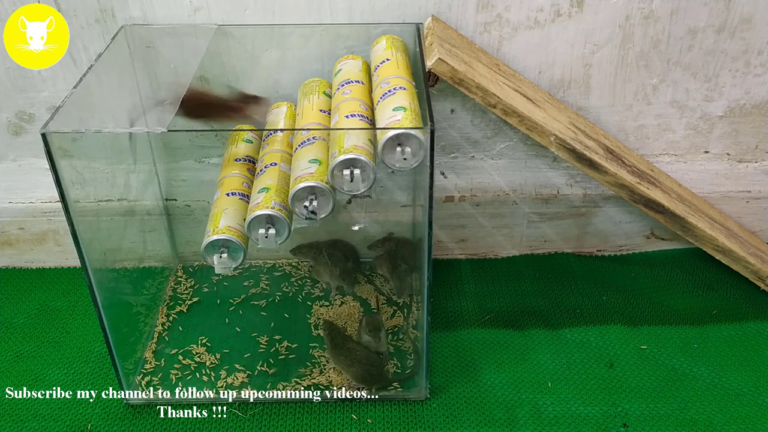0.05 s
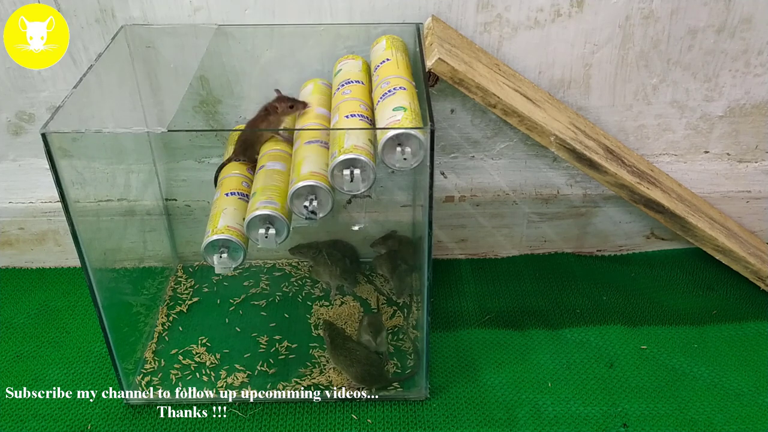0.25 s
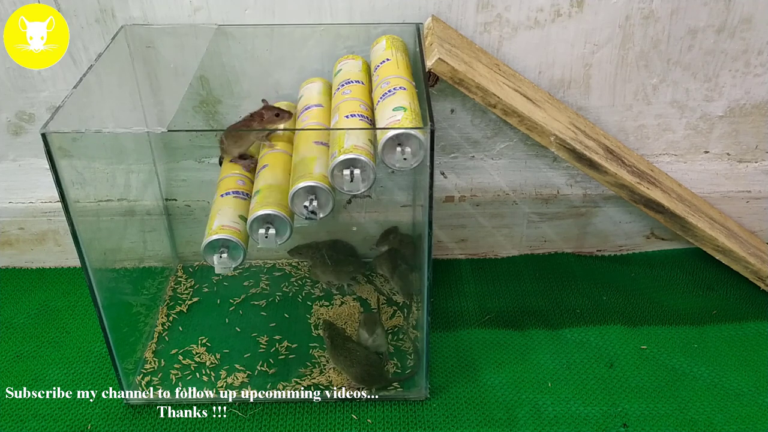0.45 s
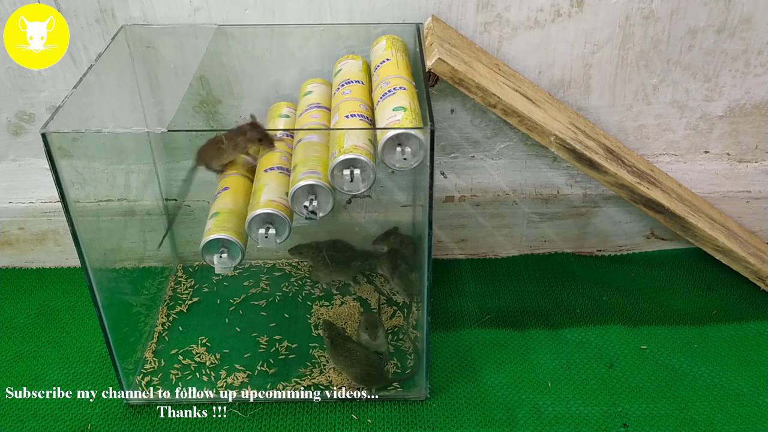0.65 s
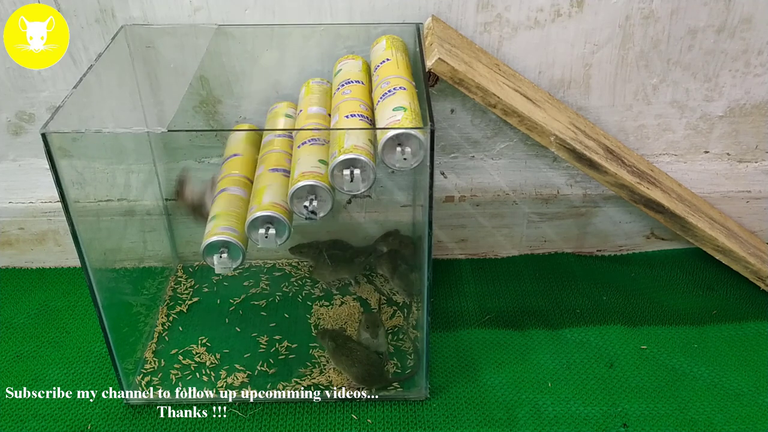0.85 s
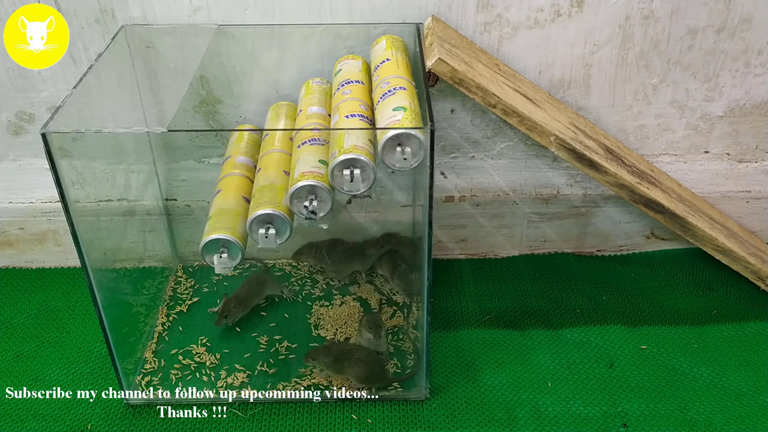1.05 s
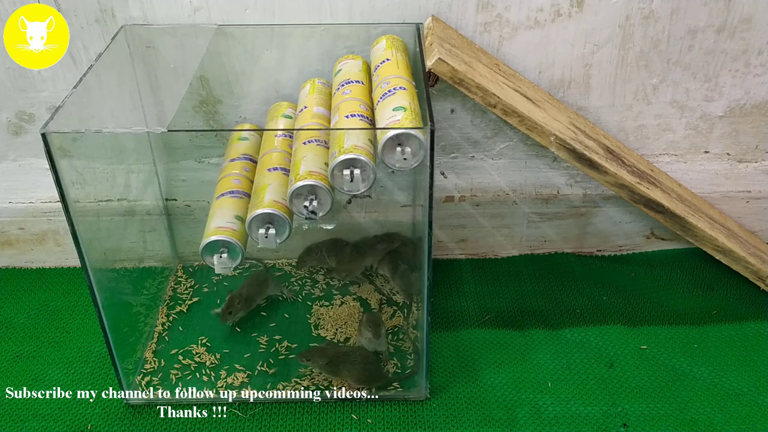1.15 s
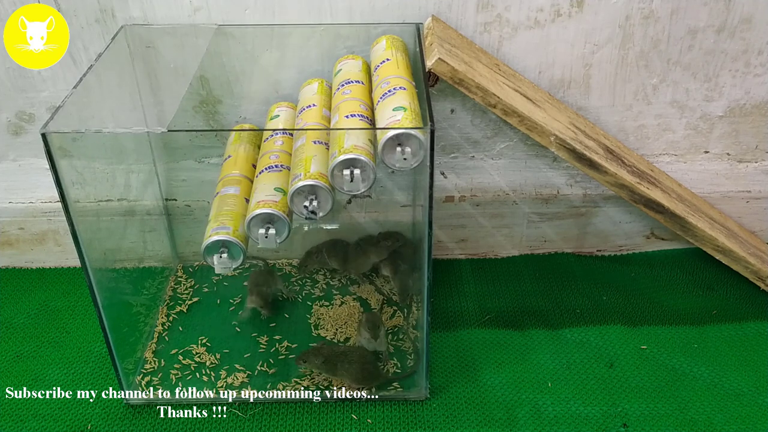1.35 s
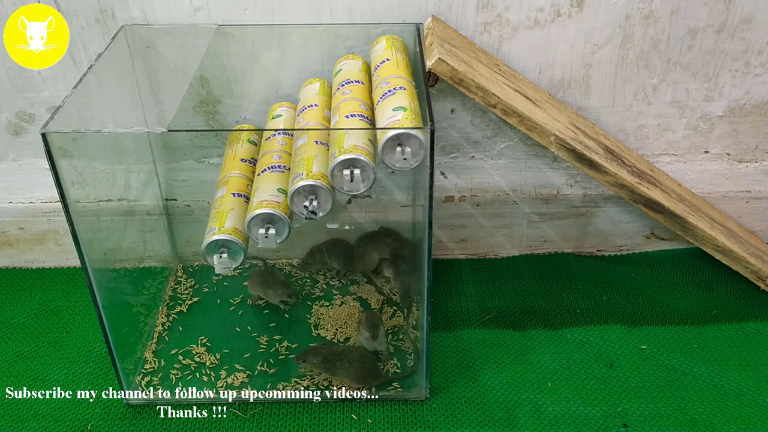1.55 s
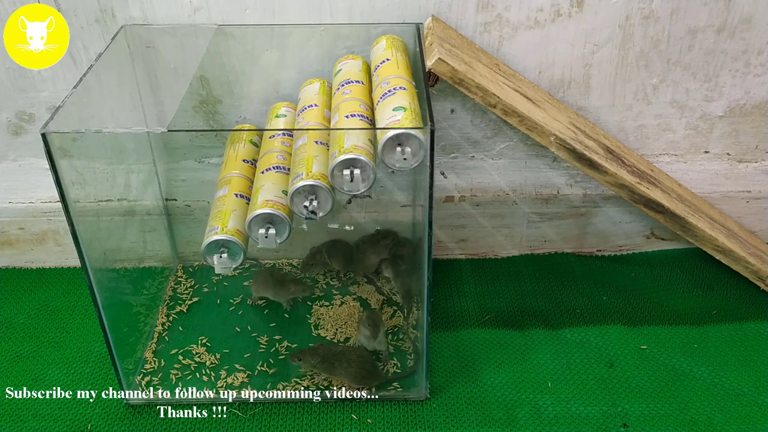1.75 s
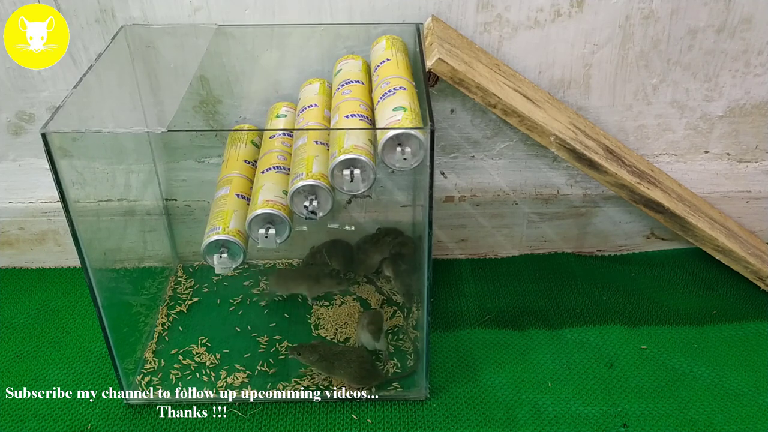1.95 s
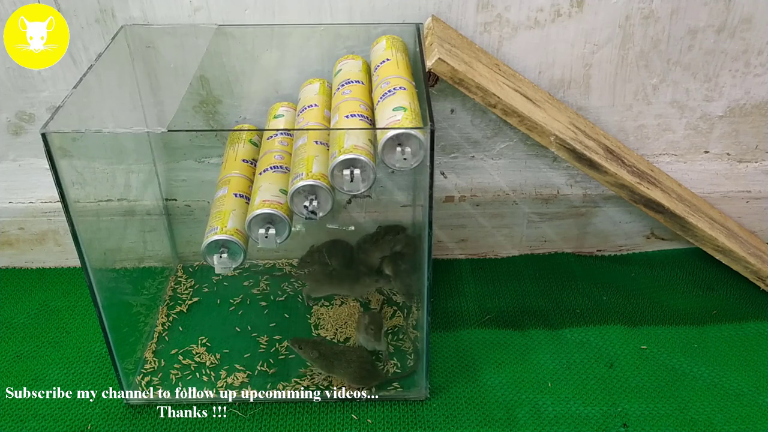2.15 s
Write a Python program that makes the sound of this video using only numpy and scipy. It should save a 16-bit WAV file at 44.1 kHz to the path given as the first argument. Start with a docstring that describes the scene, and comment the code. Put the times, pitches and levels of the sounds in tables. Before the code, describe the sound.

Empty drink cans rattle and clack as a mouse scrabbles over them inside a glass tank.

```python
"""In a bare, echoing room with a low hum, mice scurry on the seed-strewn bottom of a glass tank.
One jumps onto a row of empty drink cans laid across the tank, scrabbles, flicks a free can and slips off.
The cans clack together and buzz; the mouse drops to the bottom, and one bumps the side pane.
Each blow is a chatter of tiny contacts that rings thin can walls or glass; claws add dense ticks."""
import sys
import numpy as np
from scipy import signal
from scipy.fft import rfft, irfft
from scipy.io import wavfile
from scipy.ndimage import uniform_filter1d

SR = 44100
rng = np.random.default_rng(int(sys.argv[2]) if len(sys.argv) > 2 else 0)


def dump(signal):
    """Clip the signal to [-1, 1] and save it as 16-bit WAV at the path in sys.argv[1]."""
    limited = np.clip(np.atleast_2d(signal).T, -1, 1)
    pcm = np.round(limited * 32767).astype(np.int16)
    wavfile.write(sys.argv[1], SR, pcm)


N = 97020

# Left-right likeness. Each row: frequency in Hz, correlation.
STEREO_CORRELATION = [(60, 0.88), (170, 0.94), (350, 0.81), (700, 0.46), (1400, 0.078), (2800, 0.014),
                      (6000, -0.055), (14000, 0.051)]
# Ring of the glass tank. Each row: frequency in Hz, level in dB re the blow's band, t60 in seconds.
TANK_MODES = [(118.6, -8, 0.45), (182.4, -9.5, 0.29), (264.8, -14, 1), (435, -7.5, 0.78),
              (540.4, -19, 0.99), (809.5, -10, 0.24), (925, -13, 0.078)]
# Resonances of a can under paws, and of clacking cans. Each row: frequency in Hz, gain in dB.
PAWED_CAN_BODY = [(100, 5.5), (250, 2.5), (380, 1), (650, -2.5), (730, 1), (800, 5.5), (900, 0),
                  (1050, -2.5), (1300, 5), (1600, 4), (2000, 9.5), (2500, 8.5), (3200, 5.5), (3550, 2),
                  (4100, -0.5), (4550, -0.5), (5200, 0.5), (7000, 2), (8500, 2), (9600, -1), (11500, 5.5),
                  (16000, -5.5)]
CLACKING_CAN_BODY = [(100, -23), (500, 1.5), (1000, -3), (1250, 5.5), (1400, -5), (1900, 4), (2150, 8.5),
                     (2400, 4), (2600, 4.5), (2800, 3), (2950, -20), (3130, 4), (3390, -11), (3660, 1),
                     (4170, 3), (4480, -8), (4680, 5), (4870, -3), (5080, 5), (5270, 3.5), (5430, -3),
                     (5680, 1.5), (5880, 7.5), (6000, -4), (6300, 6.5), (6580, -2), (6760, 0), (7000, 6),
                     (7250, 1), (7700, 4.5), (8150, 1), (8600, 3.5), (8950, -6), (9150, 0), (9550, 2),
                     (10080, -6), (10400, 1), (11300, -1), (16000, -9.5)]


def amp(db):
    return 10 ** (np.asarray(db) / 20)


def unit(x):
    """Scale to unit energy per channel, on average."""
    return x / np.sqrt(np.mean(np.sum(x ** 2, axis=-1)) + 1e-20)


def along(points, hz):
    """Read a table on a log-frequency axis."""
    p = np.array(points, float)
    return np.interp(np.log(hz + 1), np.log(p[:, 0]), p[:, 1])


def bins_hz(size=N):
    return np.fft.rfftfreq(2 * size, 1 / SR)


def shape(x, gain):
    """Minimum-phase filter with the given gain per bin."""
    n = x.shape[-1]
    cepstrum = irfft(np.log(np.maximum(gain, 1e-5)))
    cepstrum[1:n] *= 2
    cepstrum[n + 1:] = 0
    return irfft(rfft(x, 2 * n) * np.exp(rfft(cepstrum)))[..., :n]


def whiten(x, smooth_hz=141):
    """Flatten the broad colour of a stereo response; keep its fine structure."""
    n = x.shape[-1]
    power = np.mean(np.abs(rfft(x, 2 * n)) ** 2, axis=0)
    smooth = uniform_filter1d(power, max(int(smooth_hz * 2 * n / SR), 1))
    return shape(x, (np.abs(smooth) / smooth.mean() + 1e-6) ** -.5)


def stereo_noise():
    """Two noises, alike in the bass, unrelated in the treble."""
    likeness = np.clip(along(STEREO_CORRELATION, bins_hz()), -1, 1)
    weights = np.sqrt([(1 + likeness) / 2, (1 - likeness) / 2])
    mid, side = rfft(rng.standard_normal((2, 2 * N))) * weights
    return irfft(np.array([mid + side, mid - side]))[:, :N]


def excite(force, response):
    return signal.fftconvolve(np.atleast_2d(force), response, axes=1)[:, :N]


def room_response(direct_db=-28, early_db=-4, early_decay_s=0.006):
    """Direct sound alike in both channels, quick tank reflections, room tail; levels re the tail."""
    # Room decay. Each row: frequency in Hz, t60 in seconds.
    room_t60 = [(100, 0.27), (250, 0.68), (530, 0.27), (1400, 0.48), (3700, 0.49), (9700, 0.46),
                (16000, 0.32)]
    t, noise, tail = np.arange(N) / SR, rfft(stereo_noise(), 2 * N), 0
    centres_hz = np.geomspace(100, 16000, 8)
    for hz, pick in zip(centres_hz, np.eye(len(centres_hz))):
        band = irfft(noise * along(list(zip(centres_hz, pick)), bins_hz()))[:, :N]
        tail = tail + band * np.exp(-np.log(1000) * t / along(room_t60, hz))
    early = stereo_noise() * np.exp(-t / early_decay_s)
    out = unit(tail) + amp(early_db) * unit(early)
    out[:, 0] += amp(direct_db)
    return unit(out)


def room_tone(air_db=-48, hum_db=-47.5):
    """Faint hiss and a wavering low hum."""
    # Colour of the room's air. Each row: frequency in Hz, gain in dB.
    air_colour = [(25, -20), (45, 1.5), (70, -4.5), (130, -2.5), (250, 2), (400, -30.5), (900, -13),
                  (2000, -35), (5000, -24), (8000, -19.5), (12000, -26.5), (16000, -46)]
    # Hum bands. Each row: centre in Hz, width in Hz, level in dB re hum_db.
    hum_bands = [(62, 8, 0), (86, 4, -2), (119, 6, -7)]
    out = amp(air_db) * unit(shape(stereo_noise(), amp(along(air_colour, bins_hz()))))
    for hz, width_hz, db in hum_bands:
        band = np.exp(-((bins_hz() - hz) / width_hz) ** 2)
        hum = irfft(rfft(rng.standard_normal(2 * N)) * band)[:N]
        out = out + amp(hum_db + db) * unit(hum)
    return out * np.sqrt(N)


def ring(hz, t60_s, t, split_hz=20.7, rise_s=0.0029):
    """A decaying mode; thin walls split off two beating neighbours, weaker below 800 Hz."""
    likeness = np.clip(along(STEREO_CORRELATION, hz), -1, 1)
    lag_rad = np.arccos(likeness) / 2 * np.array([[1], [-1]])
    neighbour, wave = amp(-2) * min(hz / 800, 1) ** 2, 0
    for side, gain in ((0.012, 0.76), (-1.043, neighbour), (1, neighbour)):
        partial_hz = hz + side * split_hz * (.5 + rng.random())
        phase = 2 * np.pi * (partial_hz * t + rng.random())
        wave = wave + gain * np.sin(phase + rng.choice([-1, 1]) * lag_rad)
    return unit(wave * np.exp(-np.log(1000) * t / t60_s) * (1 - np.exp(-t / rise_s)))


def mode_clusters(hz, spread_db=2.8, spacing_hz=110, full_from_hz=3000):
    """Random gain curve: each struck spot favours its own clusters of wall modes."""
    knots_hz = np.arange(0, SR / 2, spacing_hz)
    ripple = np.interp(hz, knots_hz, rng.standard_normal(len(knots_hz)))
    return amp(spread_db * np.minimum(hz / full_from_hz, 1) * ripple)


def strikes(blows, space, body, modes, contacts_per_s=2000, first_touch=0.15):
    """A touch and a dying chatter of contacts ring the body's modes and the struck spot's own note."""
    # Each row of blows: start in seconds, chatter decay in seconds, clink, clank, knock, thud and tick
    # band levels in dB, note in Hz, note level in dB. Levels are taken over 50 ms.
    # Each row of body: frequency in Hz, gain in dB.
    # Each row of modes: frequency in Hz, level in dB re the blow's band, t60 in seconds.
    # Edges in Hz of the thud, knock, clank, clink and tick bands.
    edges_hz = [70, 300, 1200, 3500, 8500, 17000]
    size = 2 ** 15
    out, t = np.zeros((2, N + size)), np.arange(size) / SR
    grid_hz = bins_hz(size)
    colour = amp(along(body, grid_hz))
    bands = [signal.butter(4, edge, "band", fs=SR, output="sos") for edge in zip(edges_hz, edges_hz[1:])]
    for start_s, chatter_s, clink, clank, knock, thud, tick, note_hz, note_db in blows:
        contacts = rng.choice([-1, 1], size) * (rng.random(size) < contacts_per_s / SR)
        force = unit(contacts * np.exp(-t / chatter_s))
        force[0] += first_touch
        echoed = whiten(excite(force, space[:, :size])[:, :size])
        clatter = shape(echoed, colour * mode_clusters(grid_hz))
        levels_db = (thud, knock, clank, clink, tick)
        blow = sum(amp(db) * unit(signal.sosfilt(band, clatter)) for band, db in zip(bands, levels_db))
        blow += amp(note_db) * ring(note_hz, t60_s=0.56, t=t)
        for hz, db, t60_s in modes:
            band_db = levels_db[np.searchsorted(edges_hz, hz) - 1]
            blow += amp(db + band_db) * ring(hz, t60_s, t)
        i = int(start_s * SR)
        out[:, i:i + size] += blow * np.sqrt(SR / 20)
    return out[:, :N]


def scratching(space, body, level_curve, ticks_per_s=450, spread_db=4.5):
    """Dense, uneven ticks through a body. Each row of level_curve: time in seconds, level in dB."""
    # Colour of scratching. Each row: frequency in Hz, gain in dB.
    scratch_colour = [(40, -15.5), (130, 7), (260, 6), (400, 6.5), (900, 1.5), (2100, -6), (3500, -7.5),
                      (7000, -6), (12000, -12), (16000, -8.5)]
    response = shape(whiten(space), amp(along(body, bins_hz()) + along(scratch_colour, bins_hz())))
    ticks = rng.standard_normal(N) * (rng.random(N) < ticks_per_s / SR)
    ticks *= amp(spread_db * np.minimum(rng.exponential(size=N), 2))
    envelope = amp(np.interp(np.arange(N) / SR, *np.array(level_curve).T))
    return excite(unit(ticks) * np.sqrt(N) * envelope, unit(response))


def floor_bumps(space):
    """Mice bump the tank's bottom and walls: seed rattles, glass rings."""
    # Bumps and the colour of seed on glass; columns as in strikes.
    bumps = [ (.000, 0.007, -49.5, -49, -57, -70, -52, 888, -51),
             (.026, 0.0088, -53.5, -54, -78, -47, -56, 525, -53),
             (.034, 0.012, -55, -48, -49.5, -64, -54, 117.2, -38),
             (.130, 0.044, -54.5, -53.5, -55, -44, -55.5, 127, -39),
             (1.185, 0.031, -44, -56, -50.5, -36, -54, 416, -42.5),
             (1.292, 0.003, -63, -43.5, -44.5, -41.5, -66, 92.5, -41),
             (1.353, 0.00058, -51, -41, -51, -49, -50.5, 2160, -71),
             (1.364, 0.0054, -70, -42, -48, -42, -57, 2660, -50),
             (1.372, 0.021, -67, -38.5, -43, -43.5, -53, 1900, -50),
             (1.385, 0.0058, -47, -40.5, -52, -54, -68, 2680, -50),
             (1.423, 0.027, -42.5, -53, -53, -40.5, -37.5, 221, -45),
             (1.492, 0.0087, -60, -45.5, -44, -43, -48, 90, -37.5),
             (1.575, 0.0046, -56, -44, -50, -42.5, -63, 811, -45),
             (1.602, .006, -59, -52, -61, -55, -68, 2430, -53.5), ]
    seed_body = [(100, 17.5), (700, 15.5), (1100, -1.5), (1480, 1), (1620, -4), (1850, 2.5), (2150, -4.5),
                 (2600, 0.5), (3350, -7.5), (4000, -3.5), (5000, -0.5), (5800, 1.5), (8000, -1.5),
                 (10000, 4.5), (13000, 2), (16000, -2)]
    return strikes(bumps, space, seed_body, TANK_MODES)


def claw_scrabble(space):
    """Claws scratch on metal and seed."""
    # Scratching effort. Each row: time in seconds, level in dB.
    effort = [(0, -67), (.13, -60), (.2, -42.5), (.3, -38.5), (.41, -28), (.52, -34.5), (.64, -42),
              (.75, -37), (.84, -36), (0.938, -26.5), (1.02, -30), (1.08, -39.5), (1.3, -45), (1.45, -39),
              (1.66, -52), (2.2, -53.5)]
    return scratching(space, PAWED_CAN_BODY, effort)


def paw_landings(space):
    """Paws land on the cans, ringing them and the tank beneath."""
    # Landings and the ring of a can damped by the mouse; columns as in strikes.
    landings = [ (.212, 0.0029, -34, -60, -56, -50, -43, 5940, -38),
                (.223, 0.022, -34, -34.5, -36.5, -31.5, -33, 121, -33),
                (.264, 0.0037, -29, -33.5, -32, -32, -53, 119.3, -28.5),
                (.292, 0.034, -36, -33.5, -39, -41.5, -53, 615, -46),
                (.365, 0.0018, -42, -38.5, -37, -38.5, -49, 452, -40.5),
                (.550, 0.0069, -55, -42, -37.5, -47, -46, 626, -45),
                (.564, 0.0014, -33.5, -37.5, -62, -39.5, -51, 185, -36.5),
                (.588, 0.0086, -60, -36, -76, -59, -61, 2380, -40),
                (.657, 0.006, -44, -48, -44.5, -46, -52, 280, -37.5),
                (.724, 0.004, -51, -45.5, -44.5, -46, -69, 802, -38),
                (.805, 0.0051, -51, -42.5, -42.5, -42, -52, 797, -38.5),
                (.857, 0.0087, -41.5, -48, -47, -39, -40, 753, -48), ]
    damped_modes = [(621.6, -3.5, 0.69), (708, -7, 1), (819, -15, 0.45), (2540, -17, 0.4),
                    (2696, -18, 0.33), (4150, -26, 0.19), (6200, -22, 0.093)]
    return strikes(landings, space, PAWED_CAN_BODY, TANK_MODES + damped_modes)


def claw_clicks(decay_s=0.001):
    """A claw tip snaps on metal or glass: a dry, fast-dying noise burst."""
    # Claw snaps. Each row: start in seconds, level in dB over 50 ms.
    snaps = [(.212, -48), (0.2236, -34), (.2655, -47), (.302, -37), (0.5641, -40), (0.9754, -40),
             (1.356, -49), (1.3646, -52), (1.386, -44), (1.849, -42)]
    # Colour of a click. Each row: frequency in Hz, gain in dB.
    click_body = [(200, -4), (1500, -9), (4000, 1), (8000, 1), (12000, -11.5), (16000, 3)]
    size = 2 ** 10
    out, t = np.zeros((2, N + size)), np.arange(size) / SR
    colour = amp(along(click_body, bins_hz(size)))
    for start_s, db in snaps:
        click = shape(rng.standard_normal((2, size)) * np.exp(-t / decay_s), colour)
        i = int(start_s * SR)
        out[:, i:i + size] += amp(db) * unit(click) * np.sqrt(SR / 20)
    return out[:, :N]


def can_flicks(space):
    """A paw flicks a free can, which rings brightly."""
    # Flicks, the free can's resonances and its ring; columns as in strikes.
    flicks = [ (.4415, 0.0093, -30, -37, -46, -56, -38, 4094, -39),
              (.468, .014, -56, -41, -56, -48, -43, 2425, -40), ]
    free_can_body = [(100, 0), (700, -1), (1400, -3), (1720, -4), (1950, -8), (2120, -3), (2300, 6),
                     (2480, 16), (2680, -1), (2850, -2), (3380, 1), (3480, -16), (3600, -18), (3720, 0),
                     (3900, -6), (4110, 10.5), (4380, -4), (4560, -22), (4730, 8), (5080, 4), (5280, -8),
                     (5520, 7), (5850, 7), (6120, -2), (6300, 6), (6420, -10), (6600, -3), (7130, 4),
                     (7400, 2), (7950, 4), (8250, 2), (8850, 1), (9200, -3), (9450, 2), (10300, -1),
                     (11500, 2), (16000, -10)]
    free_can_modes = [(2330, -9, 0.47), (2620, -9, 0.78), (4150, -6, 0.27), (4818, -11, 0.35),
                      (5100, -18, 0.31), (6255, -14, 0.27)]
    return strikes(flicks, space, free_can_body, free_can_modes)


def can_clacks(space):
    """Cans knock together; their thin walls and the tank ring."""
    # Collisions and the ring of the can walls; columns as in strikes.
    collisions = [ (.972, 0.00067, -29, -33.5, -39.5, -56, -34, 1856, -31),
                  (1.0357, 0.0044, -18, -26.5, -42, -50, -21, 3860, -42),
                  (1.076, 0.016, -45, -32, -37.5, -43, -28, 180.5, -37.5),
                  (1.120, 0.0056, -35.5, -42.5, -42, -49, -47, 521, -44), ]
    wall_modes = [(1575, -7, .75), (1857, -11, .5), (1890, -12, .45), (2159, -3.5, .66), (2600, -13, .5),
                  (2815, -15, .5), (3106, -15, .45), (3672, -12.5, .55), (3796, -13, .48), (3992, -14, .45),
                  (4068, -12.5, .52), (4230, -16, .5), (4651, -17, .55), (5076, -14.5, .48),
                  (5716, -14, .52), (5830, -17, .5), (6163, -16, .45), (6724, -20, .5), (6982, -17, .45),
                  (7445, -17, .42), (7719, -13, .42), (8123, -19, .5), (9545, -19, .4), (10347, -20, .38)]
    return strikes(collisions, space, CLACKING_CAN_BODY, TANK_MODES + wall_modes)


def can_buzz(space):
    """The cans go on buzzing against each other after the clack."""
    # Buzz envelope. Each row: time in seconds, level in dB.
    buzz_curve = [(0, -90), (1.03, -80), (1.05, -27), (1.12, -33.5), (1.2, -36), (1.3, -49), (1.45, -70),
                  (2.2, -90)]
    return scratching(space, CLACKING_CAN_BODY, buzz_curve)


def pane_knocks(space):
    """A mouse bumps the side pane, which rings hollowly."""
    # Knocks, the pane's resonances and its ring; columns as in strikes.
    knocks = [ (1.847, .0051, -35.5, -40, -40.5, -53, -39.5, 908, -54),
              (1.866, .01, -33.5, -40, -39, -40, -39, 935, -42.5), ]
    pane_body = [(100, 12.5), (250, 17.5), (340, 16), (420, 8), (520, 17), (620, 15.5), (820, 7), (910, 14),
                 (1020, 7), (1180, 0), (1330, 9), (1450, 3), (1590, 11), (1830, 5), (1950, 6), (2500, 3),
                 (4000, -2.5), (5000, -1.5), (6200, 4), (8000, -1.5), (10000, 6.5), (13000, 3), (16000, -6)]
    pane_modes = [(190.7, -3, 0.38), (525, -8, 0.55), (707, -16, 0.69), (1421, -15, 0.41), (1630, -16, .35),
                  (1943, -12, 0.36)]
    return strikes(knocks, space, pane_body, pane_modes)


def scene():
    space = room_response()
    cans = paw_landings(space) + can_flicks(space) + can_clacks(space)
    glass = floor_bumps(space) + pane_knocks(space)
    claws = claw_scrabble(space) + claw_clicks()
    return cans + glass + claws + can_buzz(space) + room_tone()


def record(dry, left_treble_db=2.275, ceiling=.8, top_hz=15950):
    """The left microphone is a little brighter; peaks are rounded and the top is cut."""
    lean_db = along([(4000, 0), (13000, left_treble_db)], bins_hz())
    tilted = irfft(rfft(dry, 2 * N) * amp(np.array([lean_db, -lean_db]) / 2))[:, :N]
    rounded = tilted / (1 + (tilted / ceiling) ** 8) ** (1 / 8)
    return signal.sosfilt(signal.ellip(8, .2, 70, top_hz, fs=SR, output="sos"), rounded)


dry = scene()
out = record(dry)
dump(out)
```